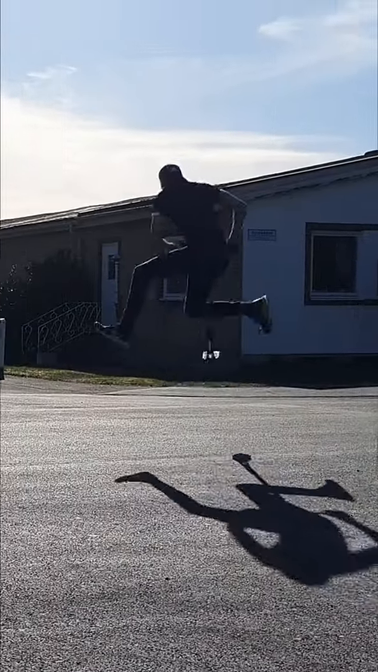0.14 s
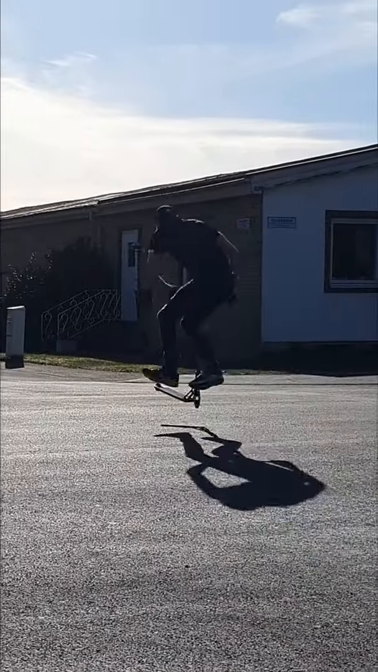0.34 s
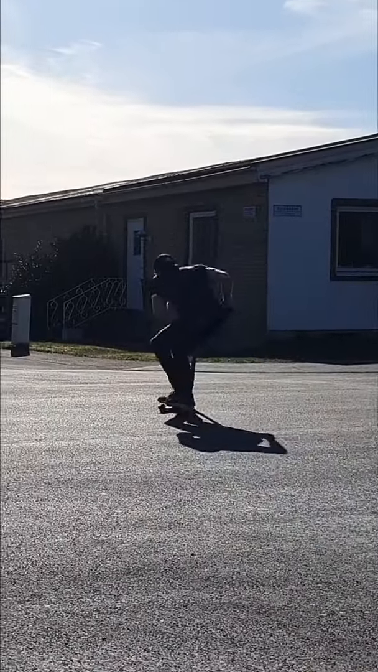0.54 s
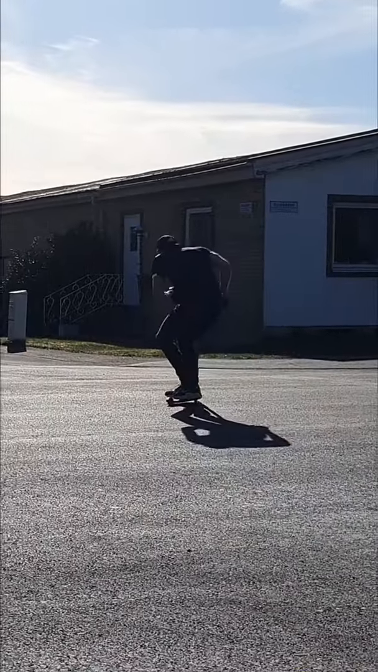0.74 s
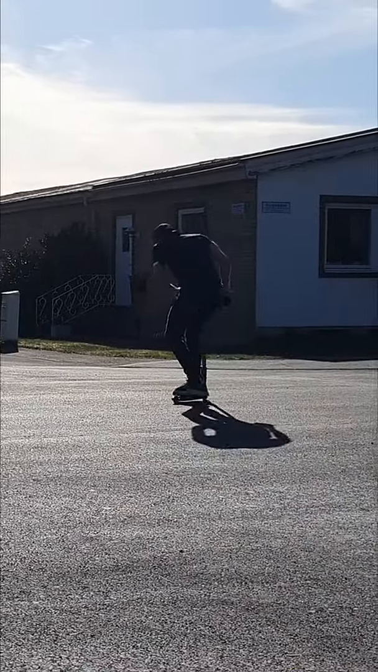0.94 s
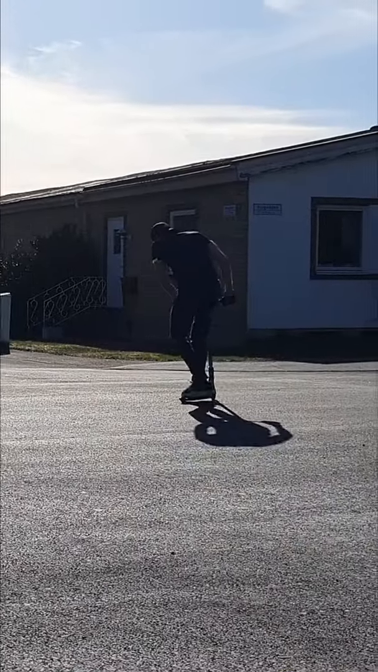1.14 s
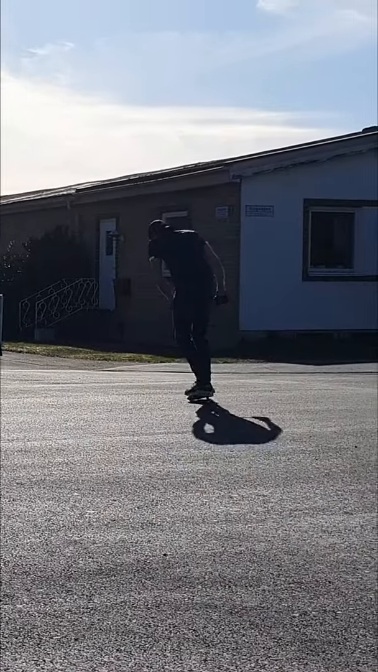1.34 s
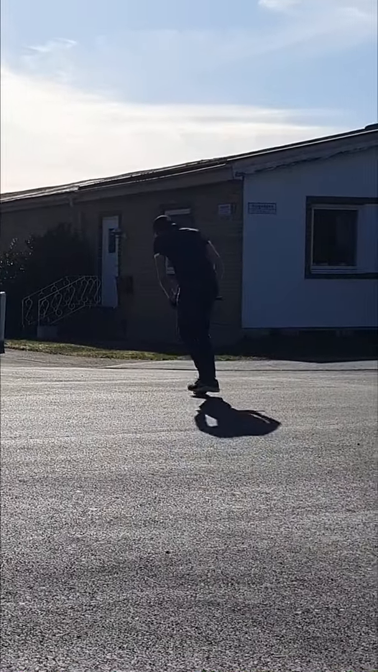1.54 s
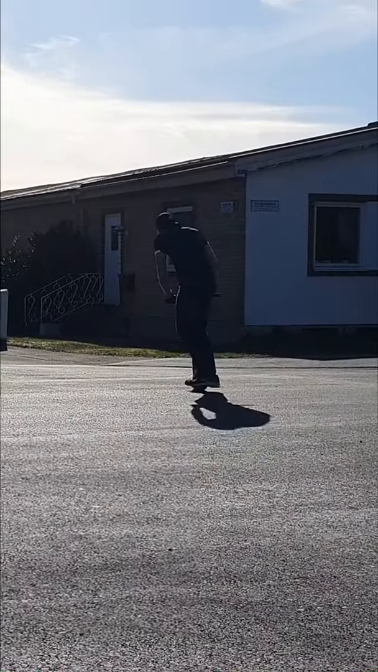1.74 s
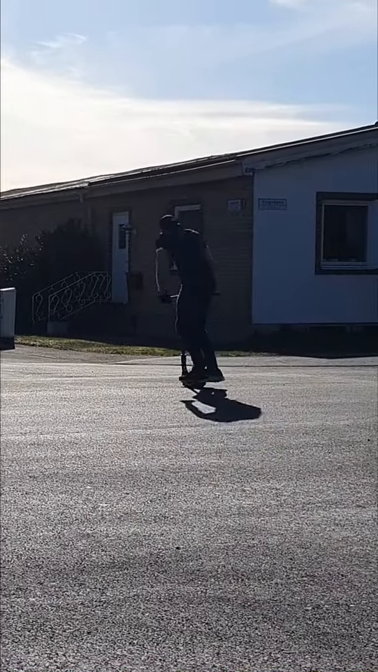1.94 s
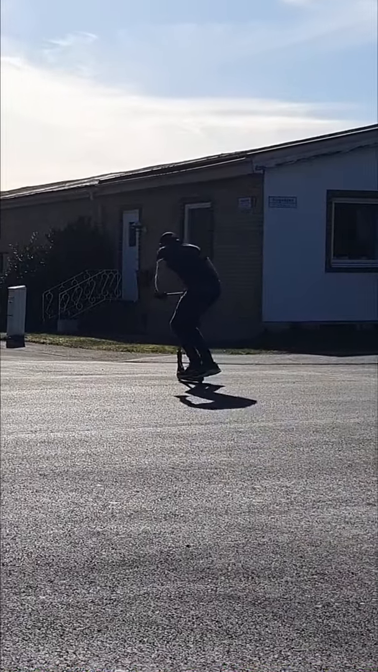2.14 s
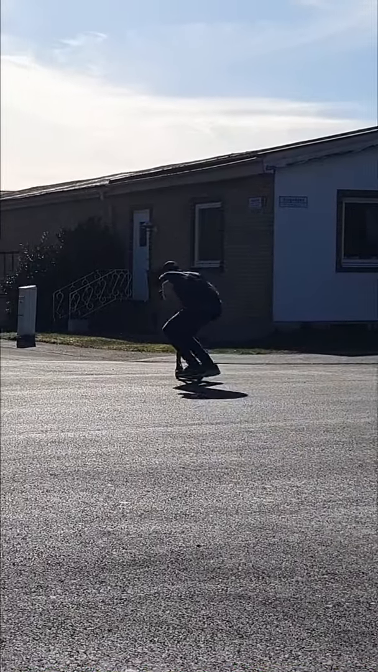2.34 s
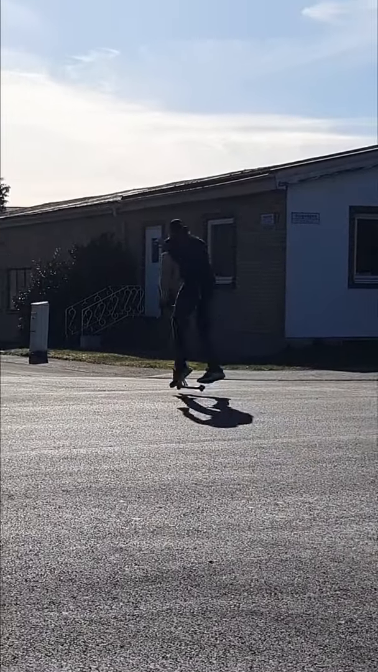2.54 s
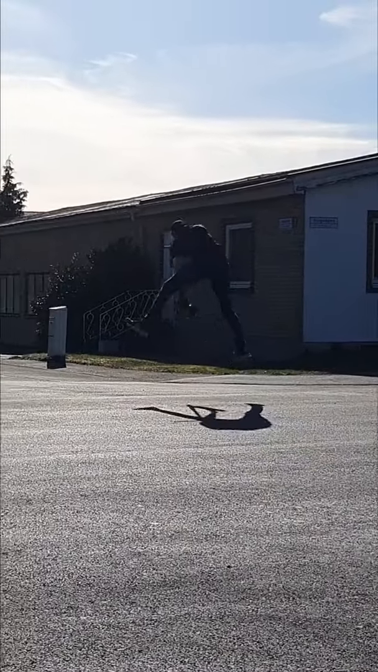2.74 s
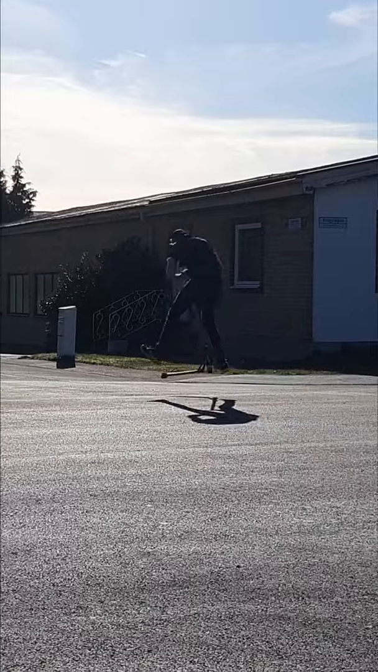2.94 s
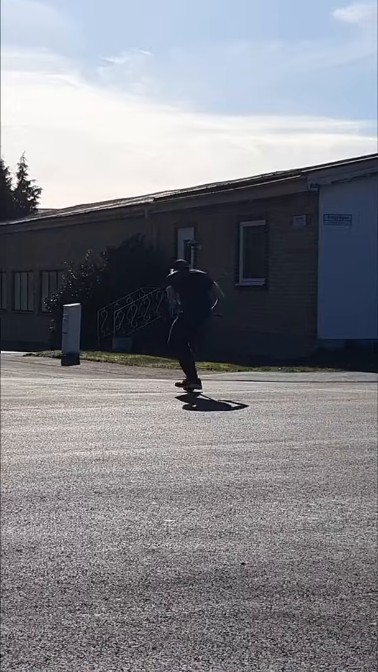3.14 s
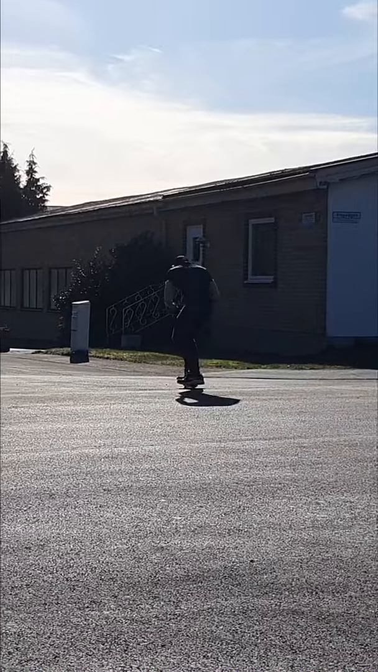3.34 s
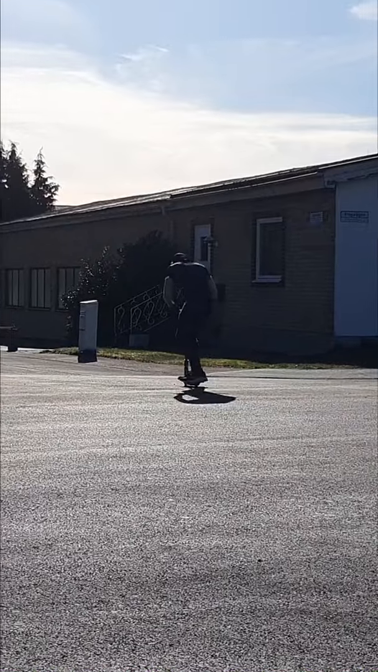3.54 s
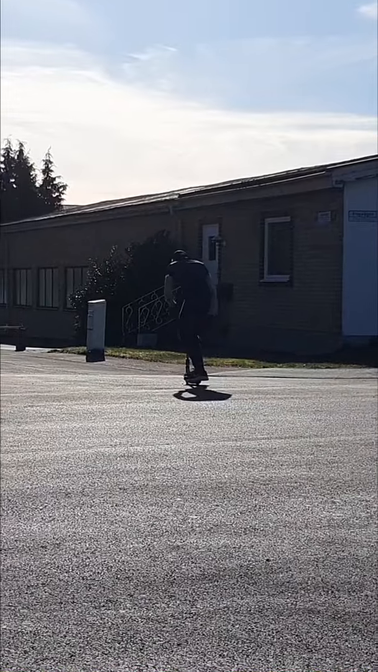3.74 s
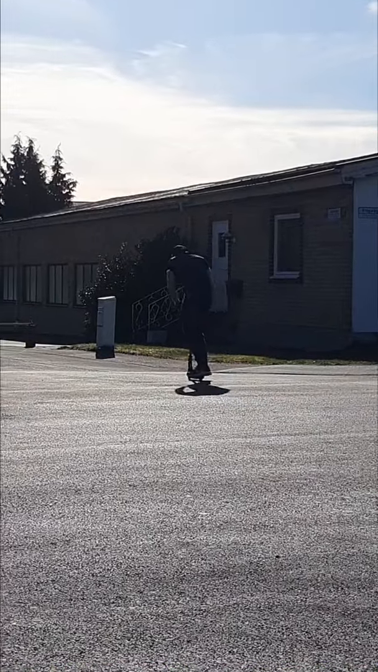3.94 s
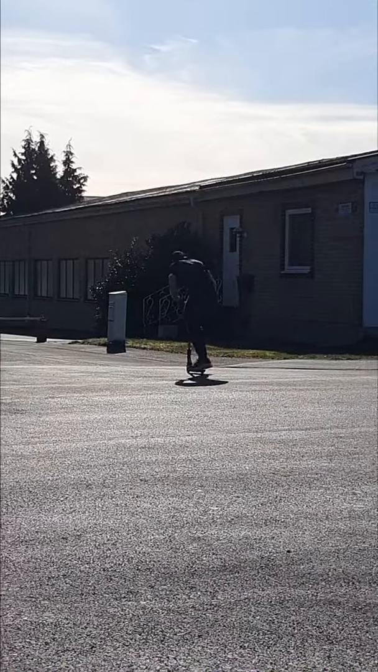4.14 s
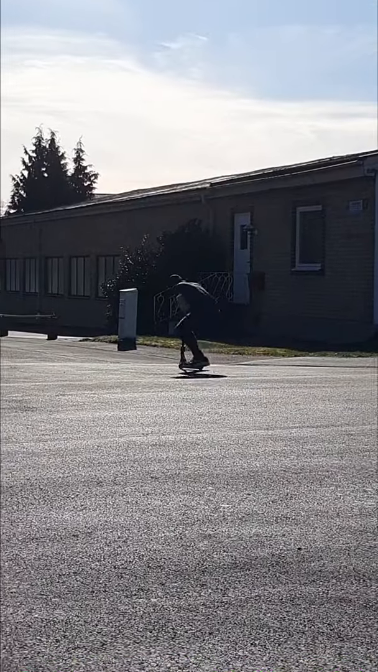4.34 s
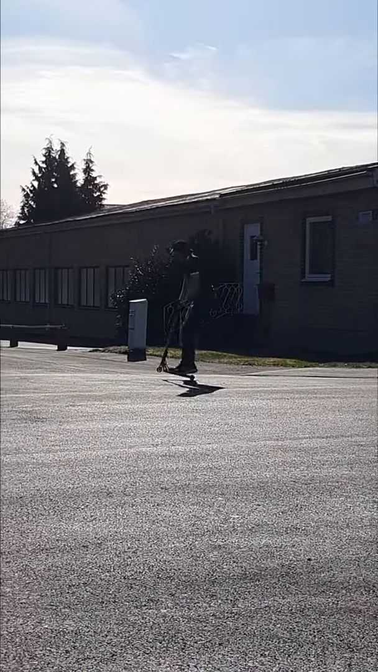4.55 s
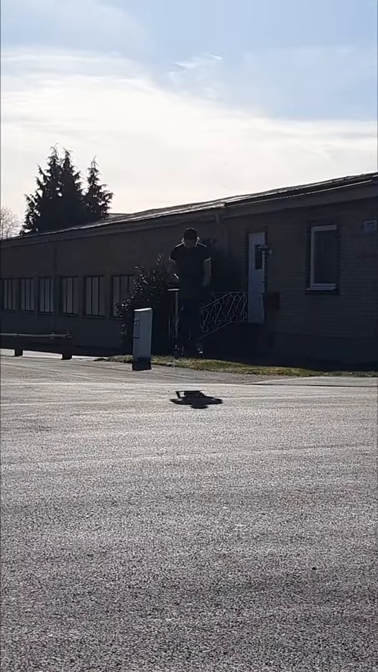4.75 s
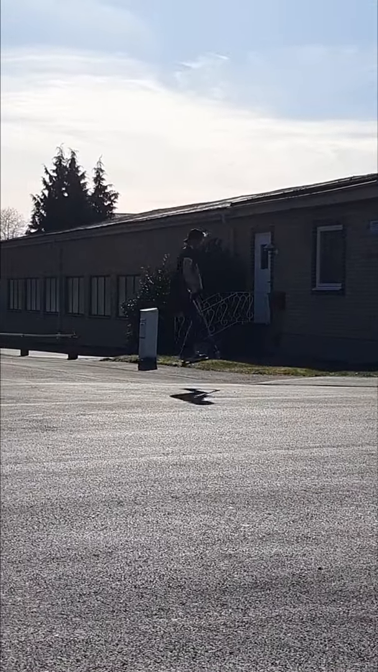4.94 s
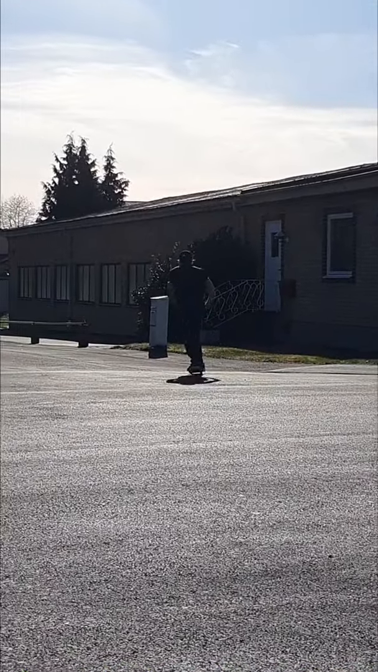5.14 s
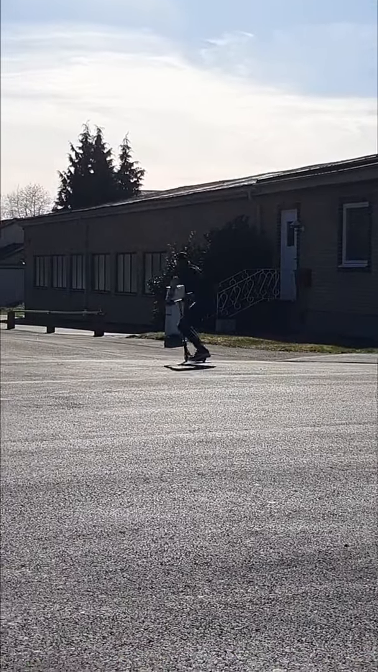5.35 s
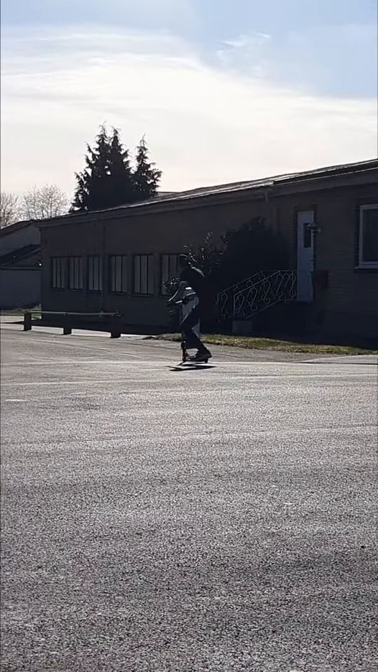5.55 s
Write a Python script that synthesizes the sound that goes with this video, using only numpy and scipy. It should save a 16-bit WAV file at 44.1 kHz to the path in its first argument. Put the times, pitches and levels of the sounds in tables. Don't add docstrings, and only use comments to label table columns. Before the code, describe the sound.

A metal stunt scooter whirrs, slams down on asphalt with a sharp clanging clack, then rattles and lands twice more amid gusty microphone wind.

```python
import sys
import numpy as np
from scipy import signal
from scipy.fft import rfft, irfft
from scipy.io import wavfile
from scipy.ndimage import uniform_filter1d, map_coordinates

SR = 44100
rng = np.random.default_rng(int(sys.argv[2]) if len(sys.argv) > 2 else 0)


def to_wav(s):
    ch = np.atleast_2d(s).T
    pcm = np.round(np.clip(ch, -1, 1) * 32767)
    wavfile.write(sys.argv[1], SR, pcm.astype(np.int16))


def attenuation_scalar(level_db):
    decades = np.asarray(level_db, float) / 20
    return 10 ** decades


N = 246519


def evened(x):
    return x / np.sqrt(np.mean(x ** 2) + 1e-20)


def smoothed_noise(count, width):
    return evened(uniform_filter1d(uniform_filter1d(rng.standard_normal(count), width), width))


def read(points, hz):
    f, value = np.transpose(points)
    return np.interp(np.log(hz + 1), np.log(f + 1), value)


def over_time(rows):
    s, *columns = np.transpose(rows)
    return np.array([np.interp(np.arange(N) / SR, s, c) for c in columns])


def add(mix, s, sound):
    part = mix[max(round(s * SR), 0):][:len(sound)]
    part += sound[:len(part)]


def causal(db):
    log_gain = np.maximum(db, -100) * np.log(10) / 20
    circle = np.concatenate([log_gain, log_gain[-2:0:-1]])
    taps = np.fft.ifft(np.exp(circle - 1j * signal.hilbert(circle).imag)).real[:3000]
    return taps / np.linalg.norm(taps)


def gritty(shape, spread_db):
    size_db = spread_db * np.minimum(rng.exponential(1, shape), 6)
    return evened(rng.standard_normal(shape) * attenuation_scalar(size_db))


def resonate(x, hz, width):
    turn = np.exp(2j * np.pi * np.cumsum(hz * np.ones(len(x))) / SR)
    r = np.exp(-np.pi * width / SR)
    return 2 * (turn * signal.lfilter([1 - r], [1, -r], x / turn)).real


def resonate_twice(x, hz, width):
    return resonate(resonate(x, hz, width), hz, width)


# (frequency [Hz], level [dB per Hz])
DECK = [(150, -29.5), (250, 1.5), (452, 0.5), (774, -13.5), (1040, -7), (1240, -10), (1470, -13.5),
        (1880, -17.5), (2160, -12.5), (3170, -20), (4260, -15.5), (6690, -26), (7960, -40.5), (8840, -32),
        (16000, -47)]
# (frequency [Hz], width [Hz], level [dB])
DECK_MODES = [(483, 33, -13.5), (760, 140, 10.5), (1040, 120, 10), (1490, 47, -3), (1811, 51, 5.5),
              (2140, 300, -3.5), (2575, 250, 2), (2950, 74, 0.5), (3580, 150, 4), (3900, 130, 1.5),
              (4874, 300, -7), (5770, 130, -2.5)]
# (lowest [Hz], highest [Hz])
PARTS_HZ = [(680, 1400), (1400, 3000), (3000, 10500), (10500, 16000)]


def deck_parts():
    hz = np.fft.rfftfreq(8192, 1 / SR)
    modes = sum(attenuation_scalar(db) ** 2 / (1 + (2 * (hz - f) / width) ** 2) for f, width, db in DECK_MODES)
    colour_db = read(DECK, hz) + 10 * np.log10(0.41 + modes)
    skirts_db = [-10 * np.log10((1 + (lo / (hz + 1)) ** 8) * (1 + (hz / hi) ** 8)) for lo, hi in PARTS_HZ]
    return [causal(colour_db + skirt) for skirt in skirts_db]


# (time [s], level [dB])
ROLL = [(0, -59), (0.83, -62.5), (1.0, -80), (1.37, -61.5), (1.7, -71), (1.95, -64.5), (2.38, -85.5),
        (2.58, -68), (2.74, -78.5), (2.89, -58), (3.02, -61), (3.25, -55), (3.47, -72.5), (3.74, -72),
        (4.56, -64), (5.06, -80), (5.32, -54.5), (5.47, -67.5)]
# (peak time [s], level [dB], rise [dB/s], fall [dB/s], bright part relative level [dB])
SHUDDERS = [(0.0, -47, 100, 52, -7.5), (0.38, -55.5, 64, 96, 1), (0.08, -63, 98.5, 102, -8),
            (0.56, -40, 59.5, 400, -12), (0.62, -51.5, 249.5, 32, -11), (1.37, -69.5, 31.5, 39, -20),
            (3.051, -72, 98.5, 6, -15), (3.3, -48.5, 59, 101, -14.5), (4.47, -74, 22, 42, -5),
            (4.811, -50.5, 253, 44, -4), (4.89, -48, 107, 350, -15), (5.05, -66, 32, 61, -2),
            (5.37, -57.5, 110, 191, -7.5)]


def rattle():
    t = np.arange(0, N, 64) / SR
    roll_parts_db = np.array([[0], [-6.5], [-20]])
    power = attenuation_scalar(np.interp(t, *np.transpose(ROLL)) + roll_parts_db) ** 2
    for s, db, rise, fall, bright_db in SHUDDERS:
        swell_db = db - np.where(t < s, rise * (s - t), fall * (t - s))
        power = power + attenuation_scalar(swell_db + np.array([[-3.5], [0], [bright_db]])) ** 2
    return np.array([np.interp(np.arange(N) / SR, t, p) for p in np.sqrt(power)])


# (time [s], level [dB], struck spot [Hz], 60 dB decay [s])
KNOCKS = [(0.1072, -30, 2550, 0.1), (0.137, -38, 2390, 0.071), (0.4947, -19, 2500, 0.077),
          (0.5078, -21.5, 3090, 0.025), (0.526, -36.5, 1850, 0.05), (2.6198, -46, 1760, 0.12),
          (2.8465, -31, 2160, 0.072), (3.1267, -30, 2190, 0.075), (3.1315, -26.5, 2140, 0.097),
          (3.1444, -33.5, 2840, 0.074), (3.2242, -45, 2180, 0.087), (4.6784, -45.5, 1870, 0.11),
          (4.9048, -25.5, 1860, 0.018), (4.9094, -25, 2310, 0.11), (4.943, -36, 2480, 0.11),
          (5.174, -29, 1540, 0.095), (5.1825, -58, 2580, 0.055), (5.23, -27.5, 1620, 0.055),
          (5.326, -55, 1890, 0.05)]
# (time [s], level [dB], struck spot [Hz], 60 dB decay [s])
TICKS = [(0.2015, -49, 2000, 0.031), (0.3168, -47, 2110, 0.067), (0.4952, -21.5, 2154, 0.1),
         (2.853, -35.5, 2540, 0.081), (2.947, -46, 2210, 0.055), (3.274, -48, 1590, 0.063),
         (4.237, -60.5, 2300, 0.069), (4.2726, -57.5, 1626, 0.17), (4.9283, -32.5, 2530, 0.061)]
# (time [s], level [dB], struck spot [Hz], 60 dB decay [s])
STAMPS = [(2.002, -58.5, 1540, 0.051), (3.157, -38.5, 1830, 0.08), (3.381, -48.5, 1600, 0.042),
          (3.881, -44, 2140, 0.02), (5.2468, -54.5, 3100, 0.072)]
# (hollow part relative level [dB], bright part relative level [dB])
KINDS = [
    (-1, -11.5),
    (-15, -12),
    (6.5, -10.5),
]
# (time [s], level [dB], bright part relative level [dB])
CRACKS = [(0.0774, -48, 0), (0.2017, -44, 5.5), (0.316, -42, -9.5), (0.4975, -11.5, -6), (0.4997, -15, -4),
          (0.5062, -17, -4), (0.5095, -15.5, -6.5), (3.1342, -25, -10), (3.1366, -16.5, -18),
          (3.147, -27, -15), (3.3814, -44, -11), (4.9042, -26.5, -9), (4.9069, -27, -3), (4.911, -24, -3),
          (4.916, -23.5, -3), (4.919, -23, -9), (4.931, -28, -16)]


def deck():
    brighter_per_db, firm_db = 0.42, -30.5
    sizzle_lost = 5.5
    force = rattle() * attenuation_scalar(1.3 * smoothed_noise(N, 300) - 4.5)
    force = np.vstack([force, np.zeros(N)])
    contacts = gritty(N, 3.9)
    spot_force, spot_hz = np.zeros(N), np.full(N, 2000.)
    t = np.arange(SR // 4) / SR
    blows = sorted((*row, *kind) for rows, kind in zip((KNOCKS, TICKS, STAMPS), KINDS) for row in rows)
    for s, db, hz, t60, hollow_db, usual_db in blows:
        bright_db = usual_db + brighter_per_db * (db - firm_db)
        sizzle_db = bright_db - 23.0 - sizzle_lost * s
        burst = attenuation_scalar(db - 60 * t / max(t60, .005)) * np.minimum(t / 0.0019, 1)
        parts_db = (hollow_db - 6.0, -6.0, bright_db - 2.0, sizzle_db, 4.5)
        for part, rel_db in zip((*force, spot_force), parts_db):
            add(part, s - .001, attenuation_scalar(rel_db) * burst)
        spot_hz[round((s - .001) * SR):] = hz
        contacts[round((s + .0015) * SR)] = 6.5
    force *= contacts
    for s, db, bright_db in CRACKS:
        parts_db = np.array([-8.0, 0, bright_db, bright_db - 19.5 - sizzle_lost * s])
        force[:, round(s * SR)] += 3.0 * attenuation_scalar(db + parts_db)
    whole = sum(signal.oaconvolve(f, part)[:N] for f, part in zip(force, deck_parts()))
    return whole + resonate(resonate(spot_force * contacts, spot_hz, 400.0), spot_hz, 310.0)


# (time [s], level [dB], frequency [Hz], 60 dB decay [s])
THUDS = [(0.1085, -21, 443, 0.012), (0.112, -18, 134.4, 0.044), (.122, -22.5, 74.7, 0.1),
         (0.5122, -20, 390, 0.023), (0.5246, -24, 168, 0.06), (2.845, -30.5, 250, 0.017),
         (3.146, -23, 330, 0.031), (3.152, -29, 251, 0.031), (3.1586, -22.5, 132, 0.024),
         (3.882, -38, 325, 0.029), (4.905, -38, 323, 0.068), (5.173, -25.5, 258, 0.046),
         (5.23, -30.5, 157, 0.084)]


def thuds():
    out, t = np.zeros(N), np.arange(SR) / SR
    for s, db, hz, t60 in THUDS:
        turns = hz * (0.5 * t + 0.0085 * (1 - np.exp(-t / 0.0096)))
        fade = attenuation_scalar(db - 60 * t / max(t60, .005))
        add(out, s, -fade * np.sin(2 * np.pi * turns) * np.minimum(t / 0.0012, 1))
    return out


# (time [s], level [dB], frequency [Hz], 60 dB decay
# [s], jostling [0-1])
RINGS = [(.496, -27, 726, .06, .5), (.515, -24, 259.5, 0.097, 0.6), (2.62, -54, 1770, .1, 0.3),
         (2.62, -62.5, 3520, .1, .4), (.496, -25.5, 414, 0.13, 0.8), (.496, -26, 990, .085, 0.3),
         (.511, -16, 427, 0.068, .1), (3.155, -48.5, 3945, 0.45, 0.36), (3.168, -56, 3570, 0.2, 0.42),
         (3.235, -45.5, 737, 0.64, 0.55), (3.226, -53, 1540, 0.45, 0.57), (3.226, -56, 1990, 0.36, 0.4),
         (3.38, -38, 774, 0.044, 0.28), (4.92, -36, 985, 0.17, 0.33), (5.24, -54, 3680, 0.24, 1),
         (5.18, -56, 3520, 0.24, 0.3),
         (.495, -25, 2106, .05, 0.5), (.496, -21, 2716, .06, 0.6), (.503, -25.5, 2920, 0.055, .4),
          (.495, -29.5, 1517, .06, 0.1), (.496, -27.5, 1900, 0.1, 0.1), (.497, -29.5, 3220, 0.084, 0.2),
          (.497, -32, 3760, 0.078, 0.1), (.497, -26, 4200, .07, 0.8), (0.521, -35, 1885, .07, 0.4),
          (.521, -37, 2000, .05, 0.5), (.55, -40.5, 657, 0.1, .5), (.61, -54, 3600, 0.18, .8),
          (.58, -55, 2560, 0.34, 0.5), (0.71, -47, 1450, 0.16, 0.65), (.61, -48, 300, 0.16, .6),
          (3.13, -29.5, 734, 0.073, 0.23), (3.131, -30, 1013, .09, .3), (3.13, -28.5, 1538, .06, 0.4),
          (3.131, -33, 2300, 0.06, 0.2), (3.131, -33.5, 2680, 0.059, 0.6), (3.137, -30.5, 2890, 0.055, .2),
          (3.132, -42, 4830, 0.099, 0.2), (3.132, -48, 5700, .06, .3), (3.224, -44, 1400, .09, 0.4),
          (3.224, -44.5, 1800, .1, .4), (3.224, -46, 2570, 0.085, 0.2), (3.224, -53, 2850, .08, .4),
          (3.224, -58.5, 4850, 0.33, .8), (3.272, -50.5, 2163, 0.18, 0.3), (3.272, -54.5, 1570, 0.17, 0.5),
          (3.272, -55, 2100, 0.14, .5), (3.8, -47.5, 1004, 0.045, .3), (4.91, -30.5, 2900, 0.16, 0.36),
          (4.909, -43, 3700, 0.21, 0.1), (4.91, -37.5, 4395, 0.13, 0.6), (4.909, -44, 1620, 0.13, 0.5),
          (4.97, -47, 1960, 0.089, 0.3), (5.03, -48, 1960, 0.11, 0.2), (5.03, -50.5, 1020, 0.15, 0.3),
          (3.131, -41, 3140, 0.043, .5),
         (.51, -40.5, 3951, .5, .2),
    (4.912, -33, 2550, .15, .3),
    (4.915, -41, 2900, .2, .3),
]


def rings():
    out, t = np.zeros(N), np.arange(SR) / SR
    for s, db, hz, t60, share in RINGS:
        jostled = evened(resonate(rng.standard_normal(SR), hz, 66.0))
        tone = (1 - share) * np.sin(2 * np.pi * hz * t) + share * jostled
        add(out, s, attenuation_scalar(db - 60 * t / t60) * tone * np.minimum(t / 0.004, 1))
    return out


# (time [s], level [dB], frequency [Hz], 60 dB decay [s])
NOTES = [(5.235, -52, 3677, .25), (5.235, -54, 3941, .15), (5.26, -69, 3575, 1.2), (3.131, -33, 640, .07),
         (3.15, -36, 422, .12), (.496, -32, 560, .07), (3.16, -50, 3569, .35), (3.23, -54, 2159, .7),
         (2.485, -58, 1550, .08), (1.425, -63, 2600, .06), (1.17, -62, 1480, .07), (.58, -52, 2630, .5)]


def clean_notes():
    out, t = np.zeros(N), np.arange(SR) / SR
    beat = 1 + .45 * np.sin(2 * np.pi * 19 * t)
    for s, db, hz, t60 in NOTES:
        tone = np.sin(2 * np.pi * hz * t) * beat
        add(out, s, attenuation_scalar(db - 60 * t / t60) * tone * np.minimum(t / .008, 1))
    return out


def stroke(rows):
    s, *columns = np.transpose(rows)
    t = np.arange(s[0], s[-1], 1 / SR)
    return s[0], signal.windows.tukey(len(t), .15), *(np.interp(t, s, c) for c in columns)


# (time [s], level [dB])
WHIRR = [
    [(0.0, -72), (0.034, -52.5), (0.118, -43), (0.144, -50.5), (0.278, -62), (0.392, -56.5), (0.43, -56),
     (0.49, -39)],
    [(2.88, -49.5), (2.914, -62), (2.954, -63), (2.976, -76), (3.026, -62), (3.12, -62)],
    [(2.58, -82), (2.622, -63.5), (2.762, -76.5), (2.85, -70)],
    [(4.45, -81), (4.472, -68.5), (4.568, -70.5), (4.62, -91)],
    [(4.76, -90), (4.822, -56.5), (4.905, -54.5)],
]
# (first pitch [Hz], last pitch [Hz], width [Hz], bearing hiss relative level [dB])
SPINS = [(2300, 1950, 690, -17.5), (2040, 2000, 540, -11.5), (2630, 2480, 360, -12.5),
         (2660, 2620, 220, -21), (2440, 2530, 800, -24)]


def whirr():
    out, airy = np.zeros(N), signal.butter(4, [3300., 10200.], "bandpass", fs=SR, output="sos")
    for rows, (first_hz, last_hz, width, hiss_db) in zip(WHIRR, SPINS):
        s, edges, db = stroke(rows)
        hz = np.linspace(first_hz, last_hz, len(db))
        grit = gritty(len(hz), 4.0)
        flutter_db = 3.0 * smoothed_noise(len(hz), 170)
        whistle = attenuation_scalar(db - 3.0 + flutter_db) * evened(resonate_twice(grit, hz, width))
        hiss = signal.lfilter([1], [1, -.6], signal.sosfilt(airy, grit))
        add(out, s, edges * (whistle + attenuation_scalar(db + hiss_db) * evened(hiss)))
    return out


# (start time [s], end time [s], level [dB], fade [dB])
DRAG = [
    (0.56, 0.75, -48.5, -29),
    (3.189, 3.496, -50.5, -24),
    (4.331, 4.612, -55, -3),
]


def drag():
    out = np.zeros(N)
    for start, end, first_db, fade_db in DRAG:
        s, edges, db = stroke([(start, first_db), (end, first_db + fade_db)])
        growl = resonate_twice(gritty(len(db), 5.1), 280.0, 200.)
        add(out, s, edges * attenuation_scalar(db) * evened(growl))
    return out


# (peak time [s], level [dB], rise [dB/s], fall [dB/s], frequency [Hz])
SCUFFS = [(.07, -60, 199, 200, 5985), (.39, -59.5, 119, 600, 6340), (.5, -50.5, 3999.5, 233, 14700),
          (.53, -63, 500, 300, 10000), (2.856, -62, 3001, 150, 9300), (3.135, -59, 2002, 250, 11900),
          (3.16, -56.5, 600, 136, 10100), (4.82, -73, 299, 62, 9400), (4.905, -48, 4000, 1500, 14270),
          (4.912, -70, 2000, 132, 11080), (5.04, -80, 200, 250, 9500), (.505, -34.5, 3000, 505, 3000),
          (.62, -55.5, 199.5, 101, 3310), (4.5, -63.5, 60.5, 100, 835), (.46, -51.5, 120, 600, 2300),
          (.09, -53.5, 101, 120, 2198), (2.0, -65, 60, 62.5, 480), (3.136, -41.5, 1999.5, 500, 2980),
          (3.3, -70, 100, 100, 2980), (5.232, -77, 3000, 300, 10600)]


def scuffs():
    out, t = np.zeros(N), np.arange(-SR // 5, SR // 2) / SR
    for (s, db, rise, fall, hz), grit in zip(SCUFFS, gritty((len(SCUFFS), len(t)), 2.5)):
        fizz = evened(resonate_twice(grit, hz, .3 * hz))
        sound = attenuation_scalar(db - np.where(t < 0, -rise * t, fall * t)) * fizz
        start = s + t[0]
        add(out, start, sound[max(round(-start * SR), 0):])
    return out


# (time [s], lag [samples])
LEFT_LAG = [(0, 4.18), (2.5, 2.5), (5.6, 1.1)]


def direct(scooter):
    later = map_coordinates(scooter, [np.arange(N) - over_time(LEFT_LAG)[0]], order=3)
    return np.array([later, scooter])


# (time [s], echo delay [s], level [dB])
WALL = [(.5, 0.1, -25), (3, 0.092, -18.5), (5.2, .092, -17.5)]


def wall(x):
    delay, db = over_time(WALL)
    late = np.interp(np.arange(N) - delay * SR, np.arange(N), x * attenuation_scalar(db), left=0)
    smear = rng.standard_normal((2, 900)) * np.exp(-np.arange(900) / 83.0)
    return signal.oaconvolve(late[None], smear / np.linalg.norm(smear[0]), axes=1)[:, :N]


# (frequency [Hz], 60 dB decay [s])
YARD = [(200, 0.44), (700, .5), (2000, 0.5), (3800, 0.42), (6000, .42), (10000, 0.3), (14000, 0.16)]


def yard(x):
    taps = rng.choice([-1., 1.], (2, SR)) * (rng.random((2, SR)) < .05) * (np.arange(SR) > 100)
    hz, t, z = signal.stft(taps, SR, nperseg=256)
    swell_db = -7.0 * np.clip((.11 - t) / 0.01, 0, 1)
    fade_db = -60 * t / read(YARD, hz)[:, None]
    tail = signal.istft(z * attenuation_scalar(swell_db + fade_db), SR, nperseg=256)[1]
    return signal.fftconvolve(x[None], tail / np.linalg.norm(tail[0]), axes=1)[:, :N]


# (time [s], level
# [dB], frequency [Hz])
PUFFS_LEFT = [(0.113, -22.5, 126), (0.2, -29, 73.6), (0.225, -32.5, 92), (0.529, -19, 110),
              (0.582, -33, 71), (.246, -38, 75), (1.27, -37, 60), (1.961, -37, 70), (3.643, -35.5, 69),
              (3.862, -37.5, 69.7), (4.308, -32, 75), (4.811, -31.5, 70), (1.995, -35, 66.2),
              (2.099, -30.5, 80.4), (2.913, -27.5, 56.7), (3.016, -27, 90), (3.043, -20, 98),
              (3.086, -18.5, 58.7), (3.164, -25.5, 100), (3.197, -27, 61.5), (3.308, -36, 75.5),
              (3.368, -30.5, 76), (3.449, -28.5, 61.5), (3.746, -25, 72), (3.981, -29, 67.6),
              (4.025, -28, 67.2), (4.06, -26, 68.6), (4.09, -19.5, 83), (4.135, -25.5, 69.4),
              (4.201, -34, 77), (4.276, -23.5, 74), (4.428, -27.5, 73), (4.536, -25.5, 88.5),
              (4.702, -22.5, 75.4), (4.756, -27.5, 98), (4.775, -22, 81), (5.181, -26, 75.6)]
# (time [s], level [dB],
# frequency [Hz])
PUFFS_RIGHT = [(0.145, -30, 69), (0.529, -21, 109), (0.698, -26, 72.5), (0.83, -29, 56.3),
               (1.394, -29, 63.4), (.442, -36.5, 70), (.58, -36, 64), (.808, -35, 72.6), (1.275, -38.5, 60),
               (1.308, -35.5, 66), (1.445, -32.5, 69), (1.468, -34.5, 60), (1.732, -35, 67),
               (1.828, -34, 65), (1.904, -34, 70), (1.985, -31, 72), (2.04, -34, 69.9), (2.595, -32, 69),
               (2.653, -33.5, 70.4), (3.076, -32, 73), (3.181, -30, 70), (3.746, -34, 62), (3.854, -34, 70),
               (4.015, -32, 72), (1.76, -28.5, 64.5), (1.875, -22.5, 96.4), (2.018, -28.5, 78),
               (2.499, -29.5, 68.5), (2.616, -27, 65.5), (2.763, -20, 77), (2.785, -25, 91),
               (2.896, -23, 90), (2.92, -23.5, 103), (2.944, -27, 87), (3.164, -28, 105),
               (3.228, -27.5, 84.5), (3.329, -32.5, 57), (3.946, -23.5, 88), (4.045, -28, 95.8),
               (4.09, -26, 58), (4.225, -25.5, 69), (4.338, -14.5, 90.2), (4.407, -25, 96),
               (4.436, -22, 65), (4.834, -29, 102), (4.872, -19.5, 75), (4.889, -22.5, 67.4),
               (5.114, -27.5, 87), (5.173, -29, 104), (5.22, -27, 80)]
# (time [s], level [dB], left over right [dB])
BUFFET = [(0.0, -53.5, -4.5), (0.7, -49, -5.5), (1.2, -65.5, -5), (1.45, -50.5, -12), (1.66, -65, -8.5),
          (2.03, -46, -6), (2.14, -57, 11), (2.4, -68, -5.5), (2.75, -50, -24), (3.03, -40, 10.5),
          (3.25, -41, 3.5), (3.5, -58, 0), (3.66, -45, 9.5), (4.28, -41.5, -6), (4.7, -45.5, 4),
          (4.9, -48.5, -12), (5.22, -40.5, 6), (5.42, -64.5, 9)]
# (frequency [Hz], level [dB per Hz])
BUFFET_COLOUR = [(12, -38), (20, -11.5), (50, 5), (76, 6.5), (95, -15), (177, -14.5), (400, -35.5),
                 (520, -67.5), (880, -120)]


def wind():
    out, t = np.zeros((2, N)), np.arange(3000) / SR
    for port, puffs in zip(out, (PUFFS_LEFT, PUFFS_RIGHT)):
        for s, db, hz in puffs:
            u = t * hz / 0.41
            swing = np.sin(2 * np.pi * hz * (t - 0.0066 * u ** 2 / hz))
            add(port, s - .55 / hz, -attenuation_scalar(db) * u * np.exp(1 - u) * swing)
    response = causal(read(BUFFET_COLOUR, np.fft.rfftfreq(8192, 1 / SR)))
    small = gritty((2, N), 1.52) * (rng.random((2, N)) < 150 / SR)
    buffet = evened(signal.oaconvolve(small, response[None], axes=1)[:, :N])
    db, pan_db = over_time(BUFFET)
    return out + buffet * attenuation_scalar(db + np.outer([.5, -.5], pan_db))


# (frequency [Hz], level [dB per Hz])
WASH = [(18, -38), (30, -2.5), (75, -0.5), (103, -15), (245, -22.5), (701, -20.5), (1130, -27.5),
        (1710, -29), (2350, -45.5), (6370, -54.5), (8070, -58.5), (12000, -55), (16000, -84.5)]
# (frequency [Hz], likeness [-1 to 1])
WASH_SAME = [(60, 0.96), (180, 1), (550, 0.26), (1650, -0.16), (4970, 0.083), (15000, -0.31)]


def traffic():
    hz = np.fft.rfftfreq(1024, 1 / SR)
    a, b, c, d, patches = rng.standard_normal((5, 513, N // 256 + 5))
    patches = evened(uniform_filter1d(uniform_filter1d(patches, 12, 0), 14, 1))
    alike = np.clip(read(WASH_SAME, hz), -1, 1)[:, None]
    left = a + 1j * b
    z = np.array([left, alike * left + np.sqrt(1 - alike ** 2) * (c + 1j * d)])
    z *= attenuation_scalar(read(WASH, hz)[:, None] + 1.62 * patches)
    wash = evened(signal.istft(z, nperseg=1024, noverlap=768)[1][:, :N])
    return attenuation_scalar(-55 + np.array([[1.5], [-1.5]])) * wash


# (frequency [Hz], level [dB])
PORT_BALANCE = [(60, 1), (250, 2), (500, 4.5), (1000, 1), (2000, 6.5), (3500, 8.5), (6800, 7), (8000, -1),
                (9000, -5), (12000, 0)]


def ports(pair):
    half_db = read(PORT_BALANCE, np.fft.rfftfreq(N, 1 / SR)) / 2
    return irfft(rfft(pair) * attenuation_scalar([half_db, -half_db]), N)


def scene():
    scooter = deck() + thuds() + rings() + clean_notes() + whirr() + drag() + scuffs()
    far = signal.sosfilt(signal.butter(2, 9000, fs=SR, output="sos"), scooter)
    heard = direct(scooter) + wall(far) + attenuation_scalar(-15.5) * yard(far)
    return ports(heard + traffic()) + wind()


def roll_off(x):
    return signal.sosfilt(signal.butter(12, 16120, fs=SR, output="sos"), x)


def record(dry):
    thinned = signal.sosfilt(signal.butter(2, 38., "highpass", fs=SR, output="sos"), dry)
    top_cut = signal.firwin(255, 16000, window=("kaiser", 9), fs=SR)
    limited = signal.oaconvolve(thinned, top_cut[None], "same")
    return roll_off(limited)


dry = scene()
out = record(dry)
to_wav(out)
```